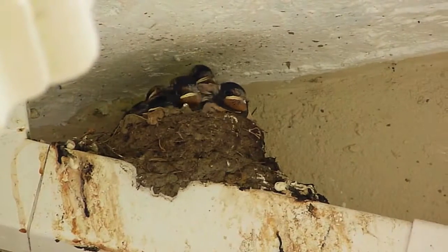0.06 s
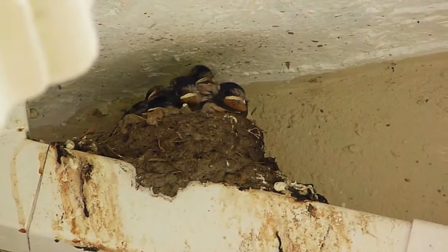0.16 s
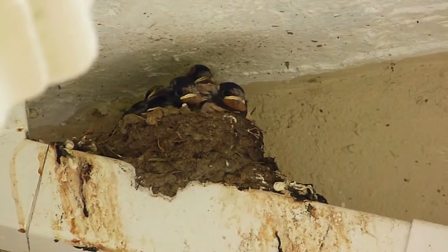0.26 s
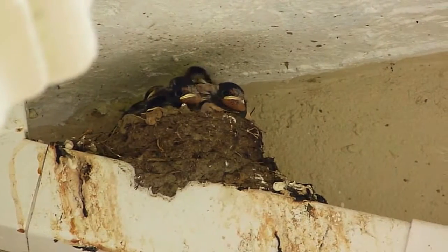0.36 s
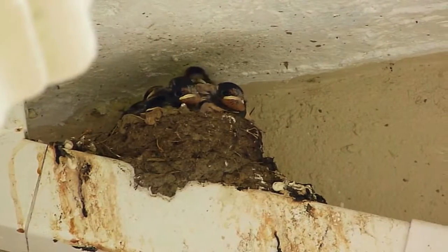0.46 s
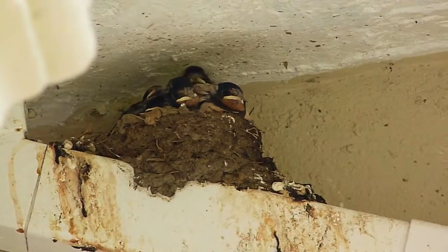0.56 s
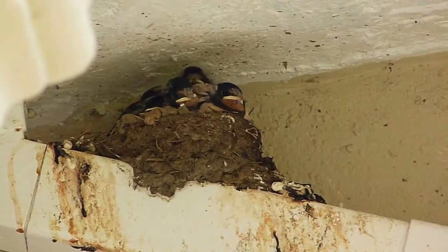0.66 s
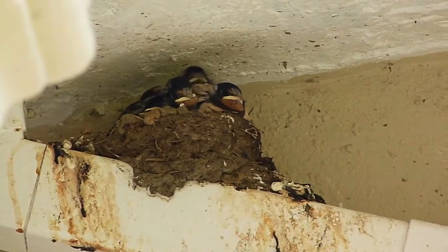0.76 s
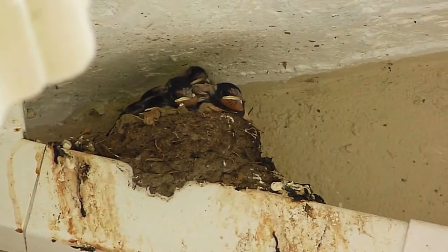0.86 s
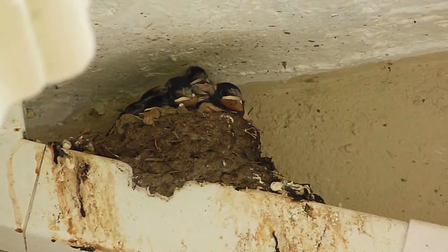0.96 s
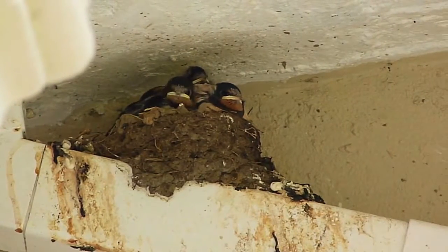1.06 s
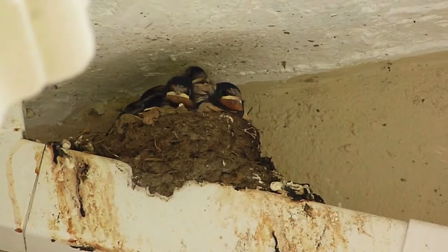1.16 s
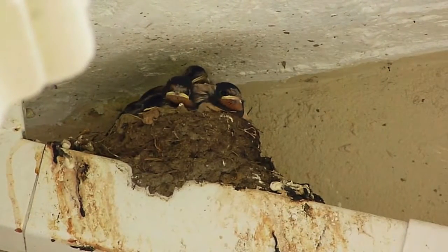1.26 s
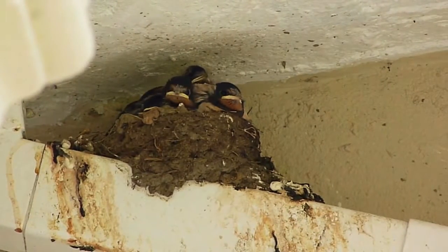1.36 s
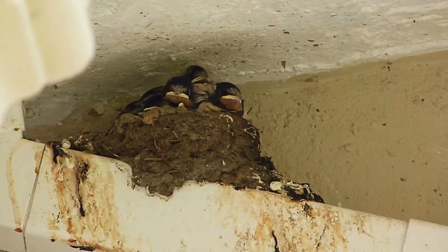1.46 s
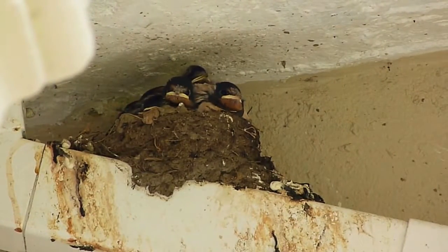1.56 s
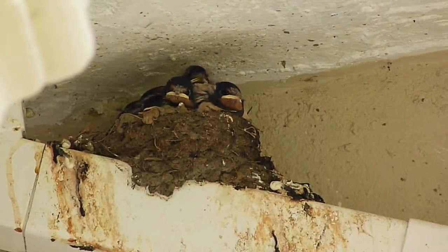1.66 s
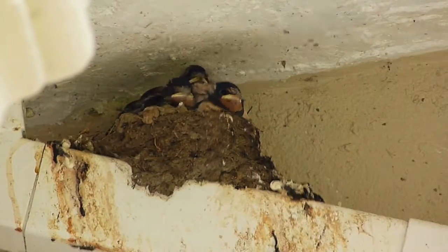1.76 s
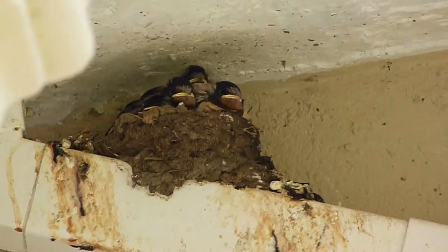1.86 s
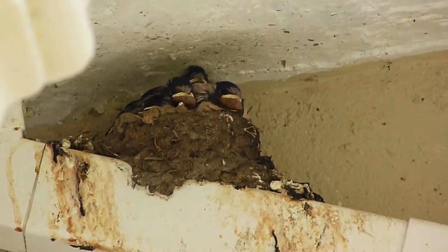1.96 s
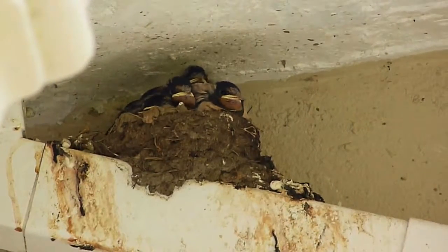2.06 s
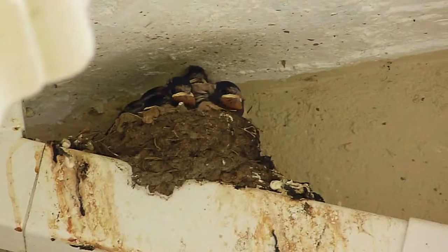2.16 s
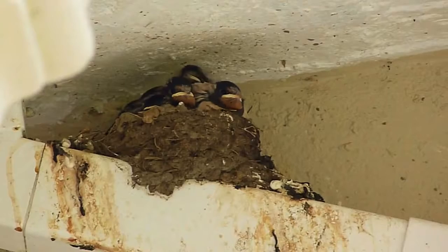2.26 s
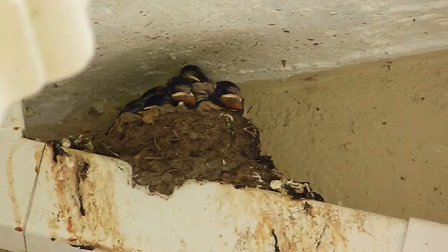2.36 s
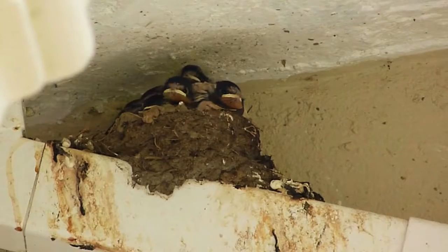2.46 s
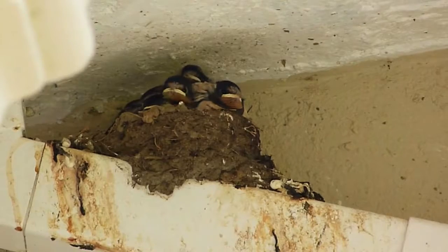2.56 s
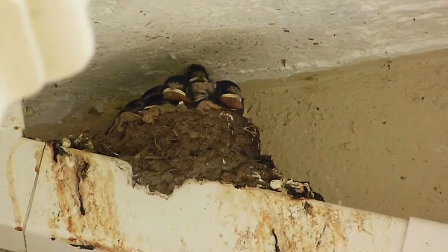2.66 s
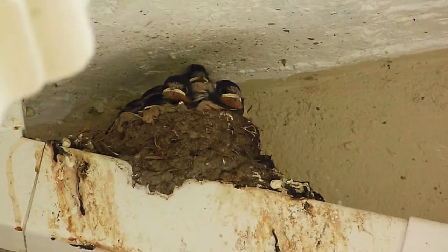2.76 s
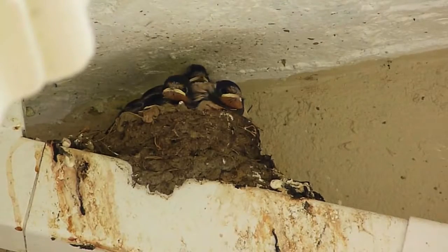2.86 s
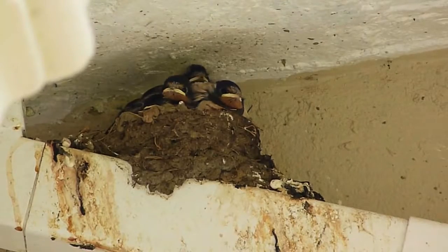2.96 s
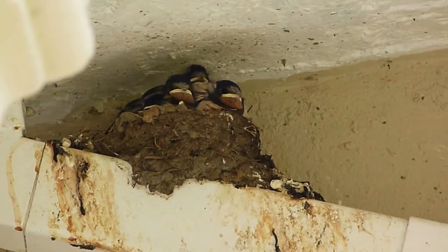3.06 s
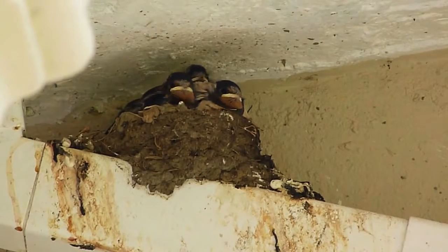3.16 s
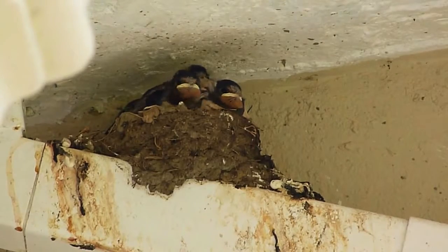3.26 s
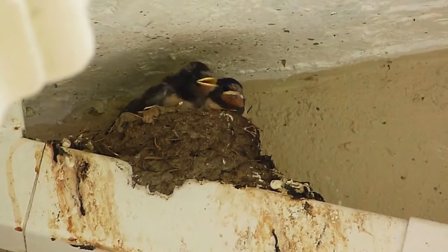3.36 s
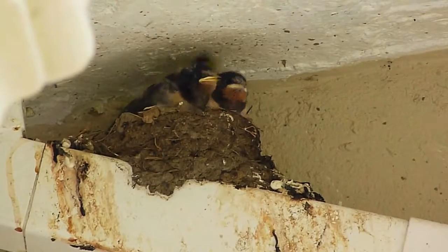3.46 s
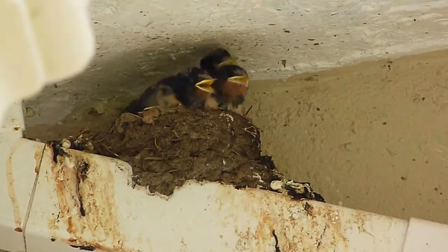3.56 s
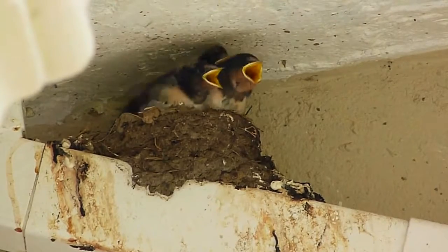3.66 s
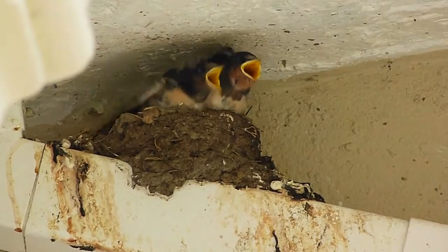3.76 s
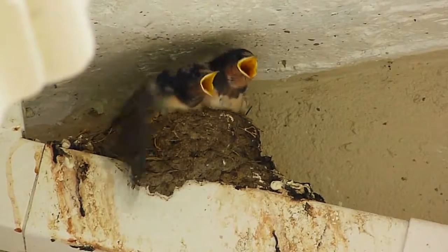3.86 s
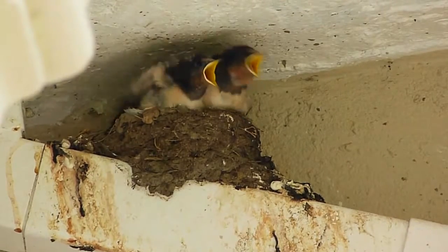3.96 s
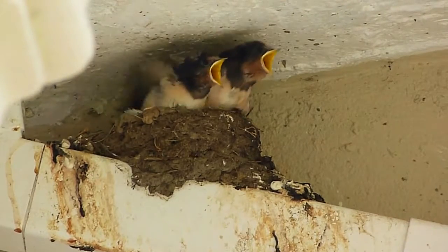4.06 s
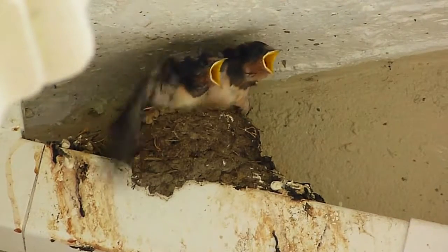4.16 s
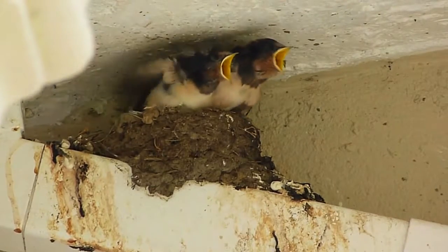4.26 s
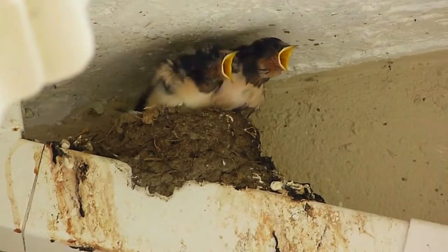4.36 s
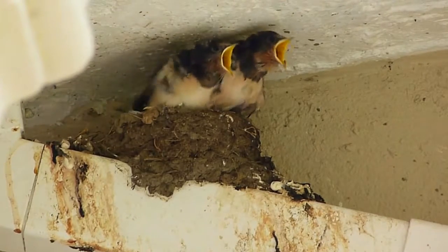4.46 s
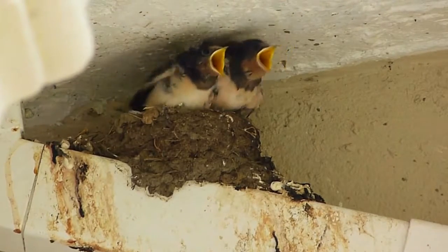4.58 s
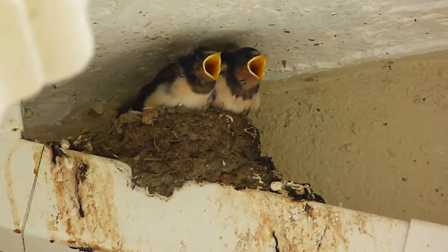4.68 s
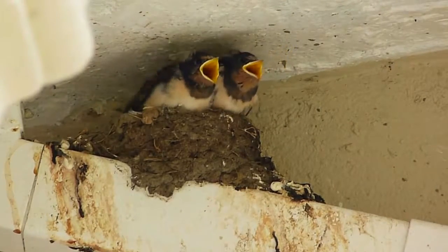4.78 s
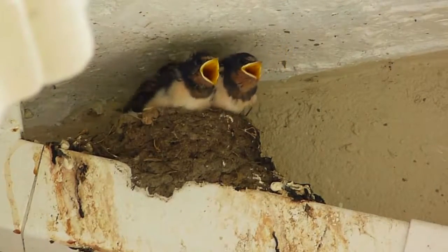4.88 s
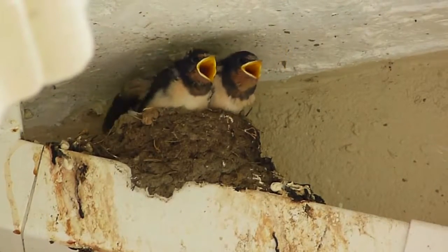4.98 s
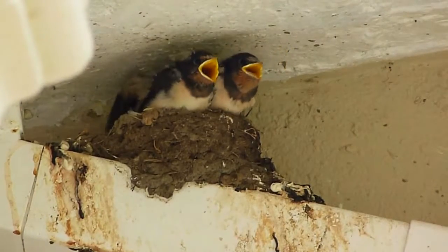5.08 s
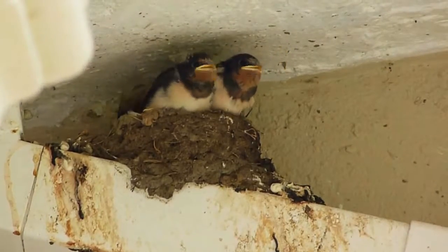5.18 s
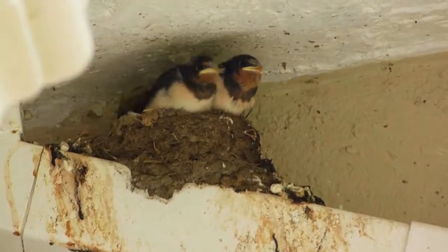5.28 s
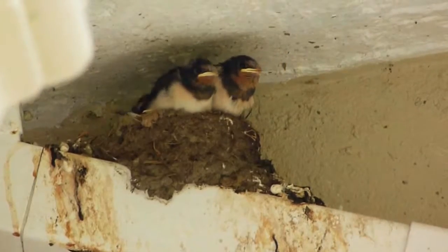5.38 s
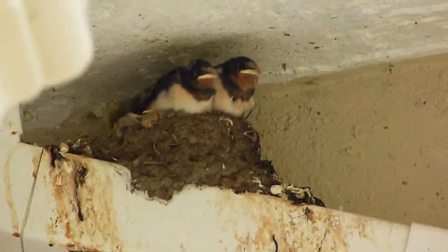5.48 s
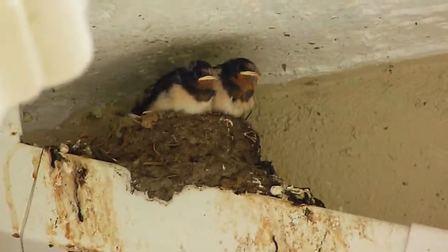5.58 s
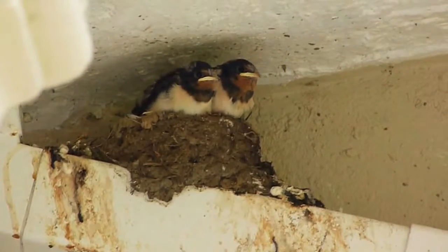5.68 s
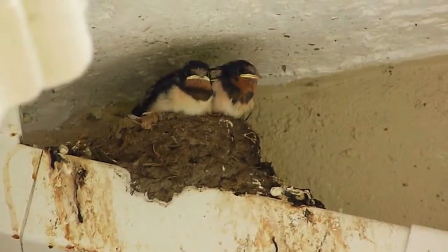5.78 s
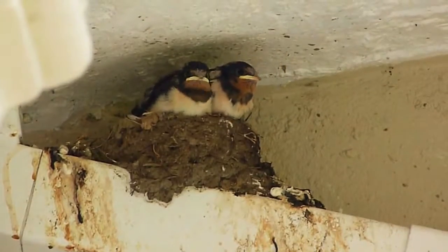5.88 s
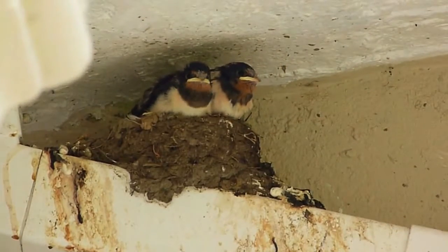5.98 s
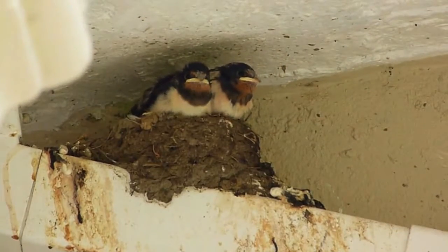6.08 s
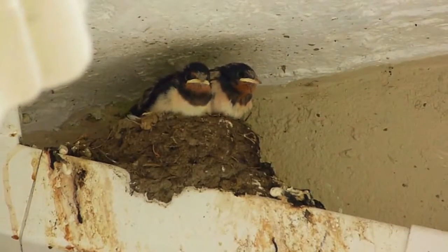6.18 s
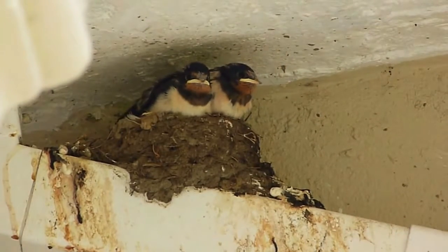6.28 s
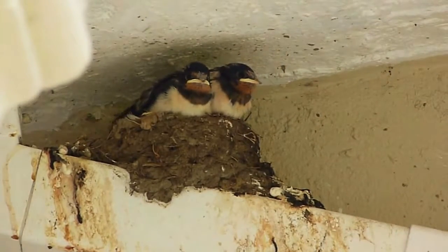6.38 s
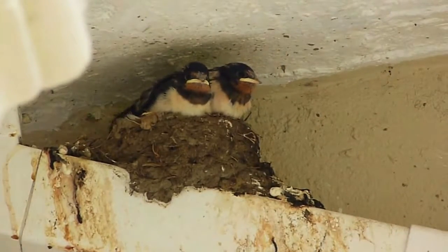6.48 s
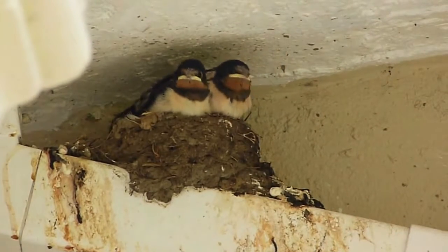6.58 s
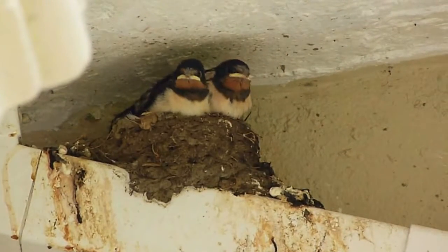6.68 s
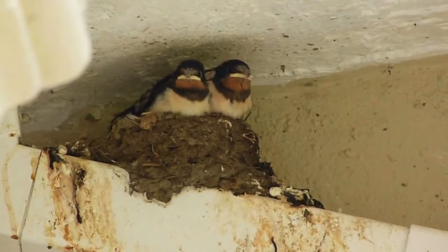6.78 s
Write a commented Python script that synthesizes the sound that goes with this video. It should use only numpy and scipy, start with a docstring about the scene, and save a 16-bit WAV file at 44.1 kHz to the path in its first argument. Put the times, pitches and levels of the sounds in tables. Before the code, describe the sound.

Sparse high chirps and faint distant birds, then a frantic flurry of harsh begging calls with small wing flutters under a porch ceiling.

```python
"""Swallow chicks beg from a mud nest under a porch ceiling: short rising harmonic notes amid a chaotic rasp,
with one clear rising call made of wavering sines. A parent whistles twice in the same way, wing beats are puffs
of low noise, far birds chip and slide as swept sines, and a steady outdoor hum is shaped noise.
Decaying noise tails serve as the ring of the hard corner walls around two microphone ports."""
import sys
import numpy as np
from scipy import signal
from scipy.fft import rfft, irfft
from scipy.io import wavfile
from scipy.ndimage import uniform_filter1d

SR = 44100
rng = np.random.default_rng(int(sys.argv[2]) if len(sys.argv) > 2 else 0)


def boost(x):
    """Linear amplitude factor 10**(x/20) for a level x in decibels (scalar or array-like)."""
    u = np.asarray(x, float) / 20
    return 10 ** u


def output_pcm(signal):
    """Save a mono or channel-first signal as 16-bit PCM at the path in sys.argv[1].

    Samples are clipped to [-1, 1] before scaling.
    """
    pcm = np.clip(np.atleast_2d(signal).T, -1, 1) * 32767
    wavfile.write(sys.argv[1], SR, np.round(pcm).astype(np.int16))


N = 301203
T = np.arange(N) / SR
TOP_HZ = 16000  # partials of notes and rasps stay below this


def curve(points, hz):
    """Spectral interpolation: read (Hz, value) points on a log-frequency axis."""
    at, value = np.transpose(points)
    return np.interp(np.log(np.maximum(hz, 1)), np.log(at), value)


def colour(x, points):
    """Linear filtering by (Hz, dB) points, falling away outside them, with unit power gain for white noise."""
    hz = np.fft.rfftfreq(N, 1 / SR)
    below = (points[0][0] / 2, -80)
    above = (points[-1][0] * 2, -80)
    gain = boost(curve([below] + list(points) + [above], hz))
    return irfft(rfft(x) * gain / np.sqrt(np.mean(gain ** 2)), N)


def walk(rate):
    """Slow random modulation: levels held for 1 / rate seconds and slewed twice; spread near 1."""
    hold = int(SR / rate)
    steps = np.repeat(rng.standard_normal(N // hold + 1), hold)
    slewed = uniform_filter1d(uniform_filter1d(steps, hold), hold)
    return 1.311 * slewed[:N]


def add(out, start, x):
    """Superposition: mix x into out from start seconds."""
    i = int(start * SR)
    out[i:i + len(x)] += x[:N - i]


def whistle(rows, waver, flutter_db, rate, overtone_db):
    """Frequency and amplitude modulation: a sine with a faint octave follows wavering pitch and level curves."""
    s, hz, db = np.transpose(rows)
    phase = 2 * np.pi * np.cumsum(np.interp(T, s, hz) * (1 + waver * walk(rate))) / SR
    tone = np.sin(phase) + boost(overtone_db) * np.sin(2 * phase)
    level_db = np.interp(T, s, db, -200, -200) + flutter_db * walk(rate)
    return np.sqrt(2) * boost(level_db) * tone


def echoes(x, t60, gap):
    """Diffuse reverberation: a dense exponential tail after a gap, independent at each port, with unit energy."""
    t = np.arange(int(t60 * SR)) / SR
    tail = rng.standard_normal((2, len(t))) * boost(-60 * t / t60) * (t > gap)
    tail = signal.lfilter([1], [1, -.15], tail)  # walls swallow some treble
    tail /= np.sqrt(np.sum(tail ** 2, axis=1, keepdims=True))
    return signal.fftconvolve(x[None], tail, axes=1)[:, :N]


# Spectrum of the hum. Each row: frequency in Hz, relative density in dB per Hz.
HUM_SPECTRUM = [(20, -32), (40, -18.5), (60, -14), (100, -4.5), (170, -0.5), (290, -6), (434, -9.5),
                (760, -7), (1380, -10.5), (1910, -15), (2240, -12.5), (5450, -20), (7000, -24.5),
                (15600, -33.5)]
# Likeness of the two ports. Each row: frequency in Hz, correlation from -1 to 1.
HUM_CORRELATION = [(60, 0.94), (130, 1), (290, 0.96), (640, .77), (1400, 0.43), (3000, -0.17),
                   (7000, -0.091), (15000, 0.11)]
# Balance of the two ports. Each row: frequency in Hz, left minus right in dB.
HUM_BALANCE = [(300, .5), (1300, -1.5), (4400, -0.5), (15000, 0)]


def hum():
    """Spatial coherence: far traffic and air, nearly alike at both ports in the bass, nearly unrelated in the treble."""
    hz = np.fft.rfftfreq(N, 1 / SR)
    alike = np.clip(curve(HUM_CORRELATION, hz), -.99, .99)
    mid = rfft(colour(rng.standard_normal(N), HUM_SPECTRUM))
    side = rfft(colour(rng.standard_normal(N), HUM_SPECTRUM))
    sign = np.array([[1], [-1]])
    both = mid * np.sqrt(1 + alike) + sign * side * np.sqrt(1 - alike)
    both = both * boost(sign * curve(HUM_BALANCE, hz) / 2)
    both = irfft(both, N) * boost(0.82 * walk(3.04))  # the level breathes a little
    return boost(-53) * both / both.mean(axis=0).std()  # dB, rms of the mean of the ports


# Rising chips of far birds. Each row: centre in seconds, centre frequency in Hz, level in dB.
CHIPS = [(2.368, 3820, -65), (2.474, 5030, -58), (2.675, 5100, -59), (2.762, 3660, -61),
         (2.87, 5030, -56.5), (3.105, 5720, -63), (3.32, 3730, -59), (6.48, 5200, -61), (6.575, 3870, -66)]
# A far call that slides down. The row: start, loudest moment and end in seconds,
# start and end frequency in Hz, peak level in dB.
SLIDE = (1.18, 1.31, 1.38, 6400, 4950, -63)
# A thin far call on one pitch. The row: start, loudest moment and end in seconds,
# start and end frequency in Hz, peak level in dB.
THIN = (2.11, 2.44, 2.58, 4200, 4200, -69)


def far_birds():
    """Swept sines: short ticks and chips, a buzzy slide and a thin pulsing whistle."""
    def arch(start, loudest, end, start_hz, end_hz, db):
        """Piecewise-linear envelope: pitch and level points, the ends 4 dB down."""
        middle_hz = np.interp(loudest, [start, end], [start_hz, end_hz])
        return [(start, start_hz, db - 4), (loudest, middle_hz, db), (end, end_hz, db - 4)]

    out = whistle(arch(*SLIDE), waver=.085, flutter_db=4, rate=500, overtone_db=-40)
    out += whistle(arch(*THIN), waver=.006, flutter_db=2.5, rate=40, overtone_db=-40)
    # level-pitched ticks, evenly spaced: centre s, Hz, dB, no rise
    ticks = [(0.4 + k * .181, 6000, -66, 0) for k in range(4)]
    chips = [row + (.22,) for row in CHIPS]  # rise as a share of the pitch
    chip_s = .021
    u = np.linspace(-.5, .5, int(chip_s * SR))
    for centre, hz, db, rise in ticks + chips:
        phase = 2 * np.pi * np.cumsum(hz * (1 + rise * u)) / SR
        add(out, centre - chip_s / 2, np.sqrt(2) * boost(db) * np.hanning(len(u)) ** .5 * np.sin(phase))
    return out


# Wing beats against the nest. Each row: loudest moment in seconds, length (twice the rise) in seconds,
# level in dB, top of the noise band in Hz.
FLAPS = [(3.687, 0.012, -40.5, 447), (3.708, 0.013, -48, 1490), (3.75, .06, -52, 150),
         (3.794, 0.0075, -39, 2900), (3.816, .015, -42, 1490), (4.294, .0127, -48.5, 500),
         (4.481, 0.0091, -48.5, 500)]


def flaps():
    """Band-limited noise bursts: wing beats as puffs of low noise with a quick start."""
    out = np.zeros(N)
    for peak, length, db, top_hz in FLAPS:
        t = np.arange(int(6 * length * SR)) / SR / length
        band = signal.butter(2, [top_hz / 8, top_hz], "band", fs=SR, output="sos")
        puff = signal.sosfilt(band, rng.standard_normal(len(t)))
        envelope = 2 * t * np.exp(1 - t * 2)
        add(out, peak - length / 2, boost(db) * puff / puff.std() * envelope)
    return out


# The parent's two-voiced arches, one table a line; the last is a short ring, likely their echo.
# Each row: time in seconds, pitch in Hz, level in dB before flutter.
WHISTLES = [
    [(4.476, 5700, -46), (4.487, 6700, -34), (4.497, 6950, -38), (4.503, 7350, -34), (4.509, 6960, -32),
     (4.516, 4970, -35), (4.52, 4500, -57)],
    [(4.483, 5140, -57), (4.49, 5240, -30.5), (4.496, 5030, -38.5), (4.503, 3020, -56)],
    [(4.582, 3460, -40), (4.59, 5300, -28.5), (4.597, 5975, -31), (4.612, 5860, -27), (4.62, 6120, -27),
     (4.626, 6200, -52)],
    [(4.615, 5050, -36), (4.621, 5070, -27.5), (4.629, 5240, -19), (4.633, 3540, -32.5), (4.636, 3300, -62)],
    [(4.64, 4740, -30), (4.648, 5010, -27.5), (4.653, 5270, -30), (4.657, 5230, -57)],
]


def parent_whistles():
    """Additive synthesis: wavering sines form the parent's two calls and a short ring after them."""
    return sum(whistle(rows, waver=0.00377, flutter_db=4.0, rate=300, overtone_db=-22) for rows in WHISTLES)


# One chick's clear rising call, one table a line: two voices, an overtone of the first, a faint higher echo.
# Each row: time in seconds, pitch in Hz, level in dB before flutter.
RISE = [
    [(3.174, 2000, -56), (3.2, 2600, -49), (3.212, 3150, -46), (3.221, 4240, -39), (3.229, 4530, -54)],
    [(3.21, 2144, -50), (3.221, 3060, -45), (3.229, 3500, -44)],
    [(3.176, 3900, -58), (3.19, 4800, -56), (3.206, 5500, -60)],
    [(3.228, 5000, -60), (3.238, 5600, -56), (3.247, 6000, -61)],
]


def rising_call():
    """Additive synthesis: two climbing voices, an overtone and a faint higher echo, each a wavering sine."""
    return sum(whistle(rows, waver=0.0024, flutter_db=2.5, rate=300, overtone_db=-14) for rows in RISE)


# The rasp of each begging call. Each row: peak in seconds, swell in seconds, drive in dB, treble drive in dB.
RASPS = [(.27, .024, -47.5, -17), (1.713, .024, -48, -12), (1.894, 0.017, -47, -13),
         (3.185, .014, -55, -14), (3.222, .014, -51, -14), (3.442, 0.018, -39.5, -22),
         (3.583, 0.025, -37, -12), (3.706, 0.027, -36, -9), (3.802, 0.015, -43.5, -12),
         (3.841, 0.02, -35.5, -6), (3.968, 0.033, -39, -11), (4.073, .02, -37, -13),
         (4.115, .029, -38.5, -10.5), (4.206, 0.031, -39, -13), (4.257, .025, -39.5, -12),
         (4.336, .025, -40, -13), (4.399, 0.032, -36, -14), (4.49, 0.018, -41.5, -5),
         (4.533, 0.037, -36, -11), (4.597, .031, -39.5, -11), (4.669, .034, -38, -5),
         (4.767, 0.024, -39, -16), (4.829, 0.022, -37.5, -10), (4.967, 0.018, -43, -3),
         (5.014, 0.026, -42, -38), (5.06, .023, -39.5, -9.5), (5.137, .018, -37, -14),
         (5.944, .021, -42, -34)]
# Spectral envelope of every rasp. Each row: frequency in Hz, relative gain in dB.
RASP_COLOUR = [(1500, -33), (2000, -3.5), (2800, 5), (3500, 3.5), (4200, 7.5), (6000, 5), (7700, -5),
               (9500, -19), (12000, -34)]
# Envelope of the added treble. Each row: frequency in Hz, relative gain in dB.
RASP_TREBLE = [(5000, -8), (8000, 9.5), (10500, 6), (13500, 3.5), (15700, -29)]


def rasps():
    """Chaotic vibration: flapping membranes give a low stack of staggering pitch, its partials patchy and breathy."""
    out = np.zeros(N)
    order = np.arange(2, 19)[:, None]
    stagger, patches = walk(600), np.array([walk(110) for _ in order])
    chance = rng.random((len(RASPS), 2))
    for (peak, swell, db, treble_db), (low, rise) in zip(RASPS, chance):
        now = slice(int((peak - .1) * SR), int((peak + .08) * SR))
        late = T[now] - peak
        climb = 1 + (.1 + .15 * rise) * np.tanh(late / swell)
        hz = (800 + 350 * low) * climb * (1 + .045 * stagger[now])
        partial_hz = order * hz
        # a rasp dies faster than it swells
        span = np.where(late < 0, swell, 0.71 * swell)
        push_db = -5.5 * np.abs(late / span) ** 1.37
        # the treble needs the hardest push, so it is briefer
        treble = boost(curve(RASP_TREBLE, partial_hz) + treble_db + 0.52 * push_db)
        gain = boost(curve(RASP_COLOUR, partial_hz)) + treble
        gain *= (partial_hz < TOP_HZ) * boost(3.5 * patches[:, now])
        noise = uniform_filter1d(rng.standard_normal(gain.shape), size=24, axis=1) * np.sqrt(24)
        breath = 1 + 0.67 * noise
        phase = order * 2 * np.pi * np.cumsum(hz) / SR + order ** 2
        stack = np.sum(gain * breath * np.sin(phase), axis=0)
        out[now] += boost(db + push_db) * stack / np.sqrt(len(order))
    return out


# Voiced chick notes. Each row: end in seconds, length in seconds, final pitch in Hz, drive in dB, kind of voice.
NOTES = [(0.243, 0.026, 1640, -56, "deep"), (0.268, 0.027, 1682, -45, "mellow"),
         (.283, .024, 1860, -40.5, "mellow"), (1.678, .028, 1560, -52.5, "deep"),
         (1.715, .019, 1670, -49, "bright"), (1.724, 0.034, 1773, -42, "mellow"),
         (1.913, .032, 1790, -43, "mellow"), (3.438, .04, 2680, -44.5, "bright"),
         (3.469, .038, 1605, -33.5, "sweeping"), (3.594, .024, 1826, -39.5, "mellow"),
         (3.7, 0.018, 1900, -42, "bright"), (3.728, .042, 1751, -32.5, "sweeping"),
         (3.85, .018, 1900, -34.5, "bright"), (3.853, .031, 1706, -33, "sweeping"),
         (4.001, .032, 2024, -40.5, "high"), (4, 0.024, 1620, -38, "sweeping"),
         (4.085, 0.019, 1856, -35.5, "bright"), (4.13, .022, 1070, -41, "steady"),
         (4.206, 0.026, 1820, -38, "bright"), (4.276, .045, 1477, -42.5, "mellow"),
         (4.287, 0.047, 1980, -42, "high"), (4.407, .018, 1407, -36.5, "deep"),
         (4.549, .013, 1430, -34, "mellow"), (4.782, 0.019, 1826, -35.5, "bright"),
         (4.839, .036, 1040, -36.5, "steady"), (4.984, 0.029, 1029, -41.5, "steady"),
         (5.026, .024, 1814, -36, "bright"), (5.059, .02, 1060, -36, "steady"),
         (5.079, 0.02, 1665, -32, "bright"), (5.142, .032, 1034, -41, "steady"),
         (5.148, 0.028, 1792, -35.5, "mellow"), (5.205, 0.019, 1580, -48, "steady"),
         (5.36, .032, 1540, -48.5, "steady"), (5.935, 0.029, 1085, -39, "steady"),
         (5.963, .021, 1030, -31.5, "steady"), (5.964, .022, 1100, -34, "steady")]
# Kinds of voice by name. Each row: throat resonance in Hz, mean upward glide in Hz per second,
# beak resonance in Hz, beak gain in dB, swell as a share of the length.
VOICES = {"steady": (4040, 197, 10500, -38, .3), "high": (5900, 290, 9500, -31, .6),
          "bright": (5130, 6560, 9000, -28, .6), "sweeping": (4800, 14000, 10000, -24, .6),
          "mellow": (3900, 8500, 7100, -15.5, .7), "deep": (2900, 5000, 6000, -20, .4)}


def notes():
    """Source and filter: gliding harmonics level off; the throat lifts one harmonic, the beak a few high ones."""
    out, waver = np.zeros(N), walk(500)
    order = np.arange(1, 13)[:, None]
    flutter = np.array([walk(280) for _ in order])
    for end, length, end_hz, db, kind in NOTES:
        throat_hz, glide_hz_per_s, beak_hz, beak_db, swell_share = VOICES[kind]
        u = np.linspace(-.15, 1.15, int(1.3 * length * SR))  # 0 to 1 over the length, with margins
        now = slice(int(end * SR) - len(u), int(end * SR))
        glide_hz = glide_hz_per_s * length * np.maximum(1 - u, 0) ** 2.6
        hz = (end_hz - glide_hz) * (1 + .019 * waver[now])
        partial_hz = order * hz
        width_hz = min(end_hz ** 2 / 2100, 1400)  # sharper on low notes
        # the throat opens with the glide, so one harmonic leads nearly throughout
        opened_hz = throat_hz * (hz / end_hz) ** 0.52
        throat = 1 / (1 + np.abs((partial_hz - opened_hz) / width_hz) ** 3.1)
        beak = boost(beak_db) / (1 + ((partial_hz - beak_hz) / 1300) ** 2)
        # a body this small radiates little below 2 kHz
        radiation = 1 / (1 + (2200 / partial_hz) ** 8)
        gain = (throat + beak) * radiation * (partial_hz < TOP_HZ) * boost(2.66 * flutter[:, now])
        phase = order * 2 * np.pi * np.cumsum(hz) / SR + order ** 2
        stack = np.sum(gain * np.sin(phase), axis=0)
        swell = np.clip((u + .15) / swell_share, 0, 1) * np.clip((1.15 - u) / .25, 0, 1)
        add(out, end - length * (1 - u[0]), boost(db) * swell * stack)
    return out


def scene():
    """Direct sound plus reverberation: the nest near the centre, the parent to the right, far birds to the left."""
    nest = notes() + rasps() + rising_call()
    parent = parent_whistles()
    far = far_birds()
    near = nest + parent
    lean = np.array([[.5], [-.5]])  # times left minus right in dB
    direct = nest * boost(-.6 * lean) + parent * boost(-2. * lean) + flaps() + far * boost(7.9 * lean)
    porch = boost(-4) * echoes(near, t60=.13, gap=.0015)
    yard = boost(-16) * echoes(near, t60=.5, gap=0.033)
    far_ring = boost(-5.0) * echoes(far, t60=0.067, gap=0.0019)
    return direct + porch + yard + far_ring + hum()


def low_pass(x):
    """Removes everything above the highest recorded frequency."""
    return signal.sosfilt(signal.butter(12, 15710, fs=SR, output="sos"), x)


def record(dry):
    """Signal chain: the finished mix passes through its last stage."""
    return low_pass(dry)


dry = scene()
out = record(dry)
output_pcm(out)
```